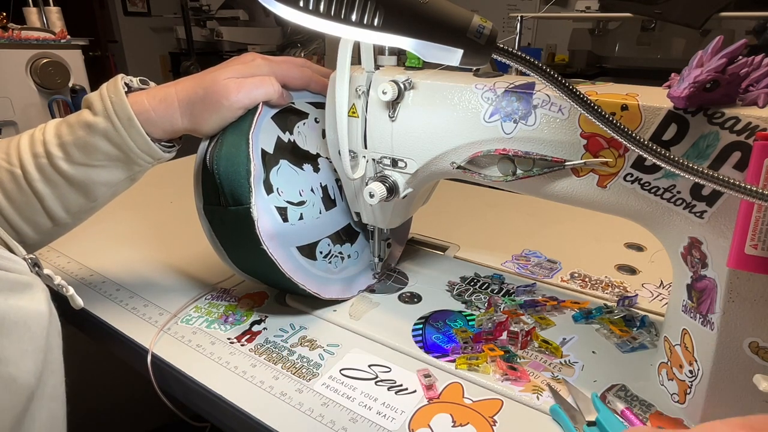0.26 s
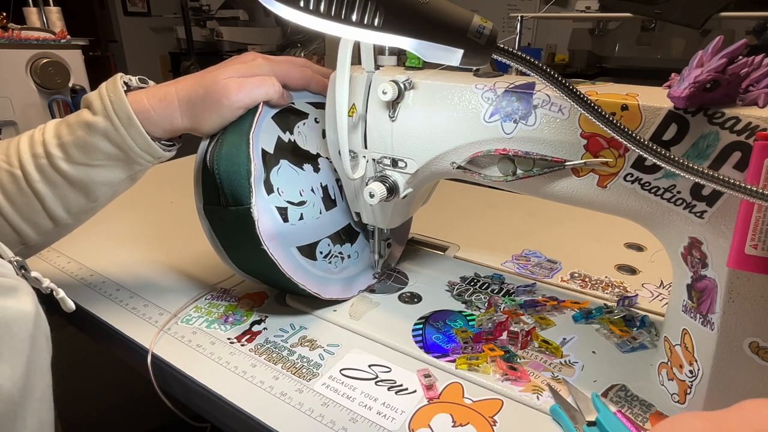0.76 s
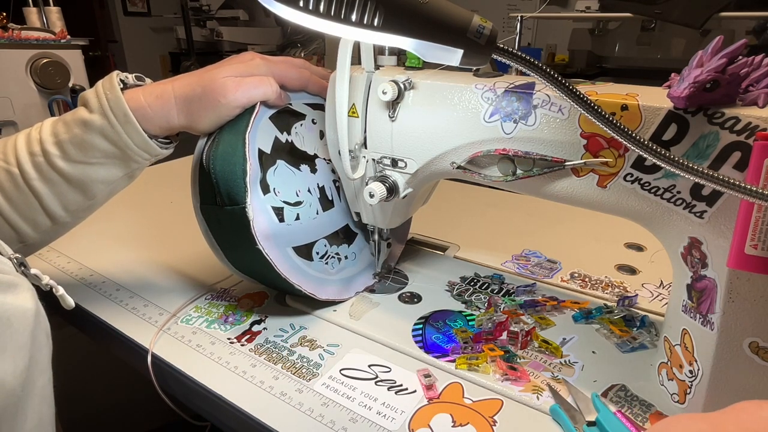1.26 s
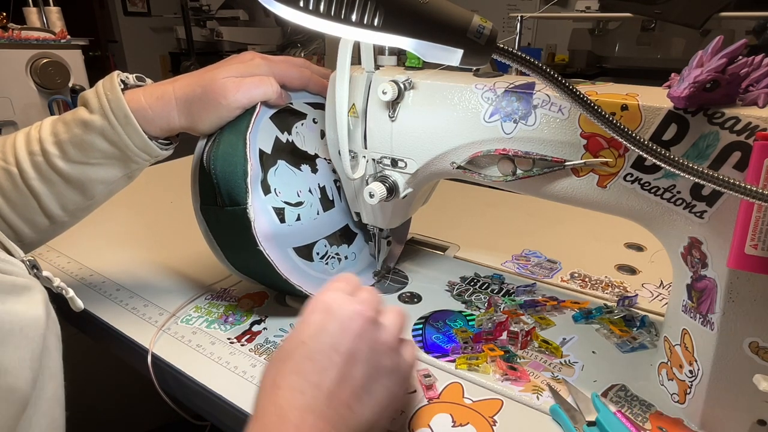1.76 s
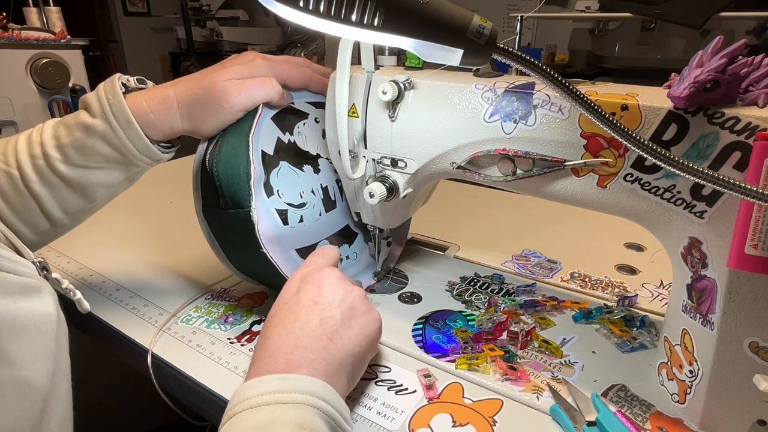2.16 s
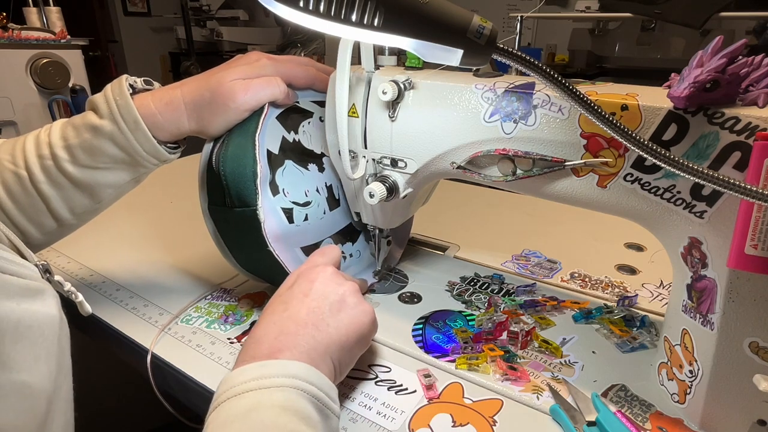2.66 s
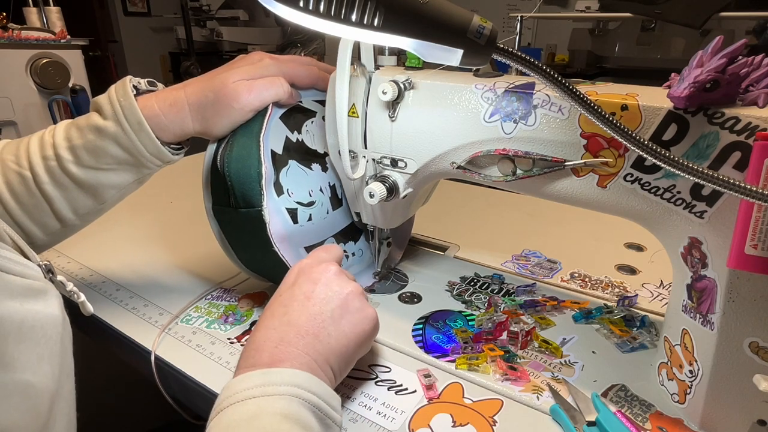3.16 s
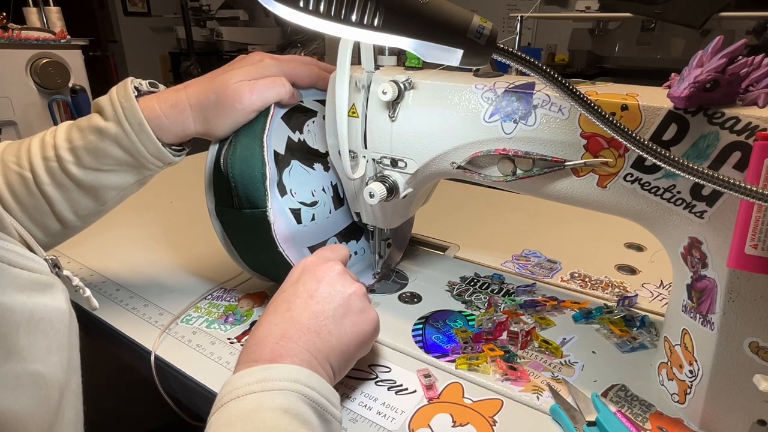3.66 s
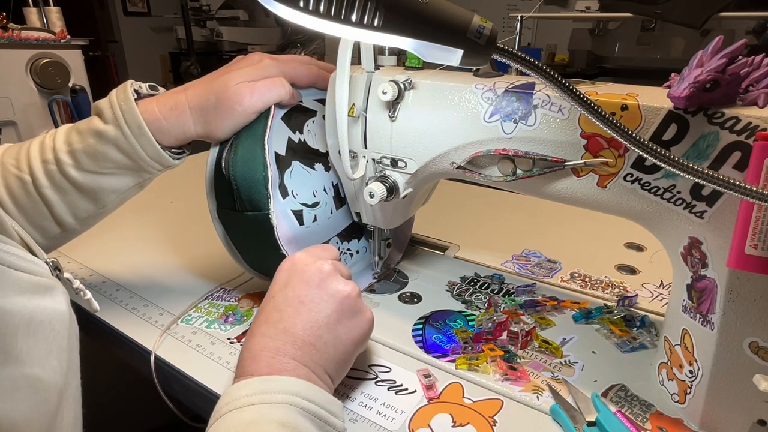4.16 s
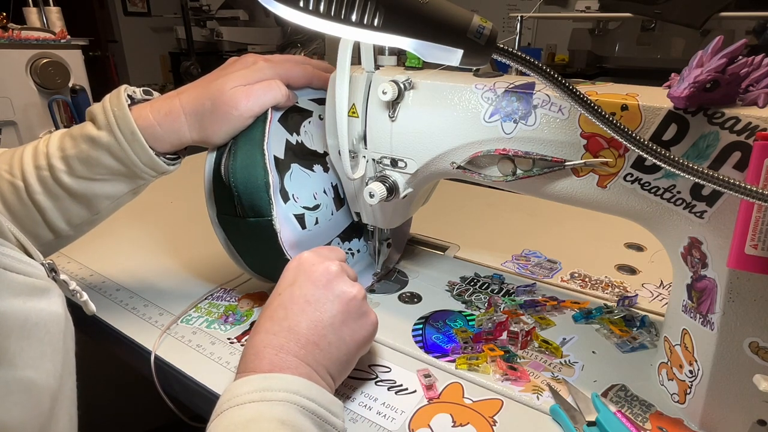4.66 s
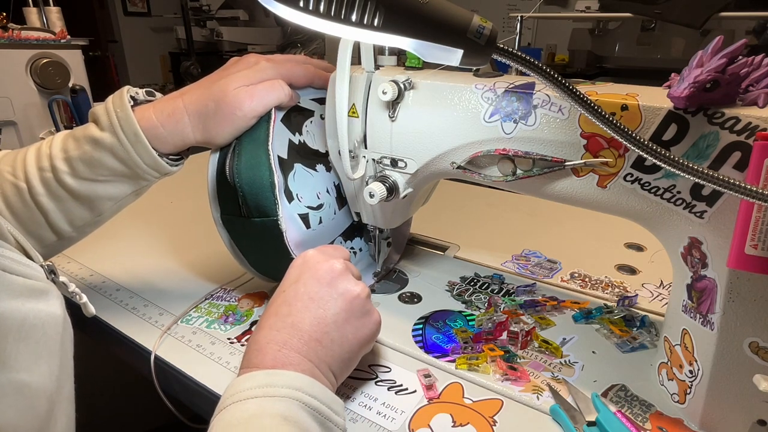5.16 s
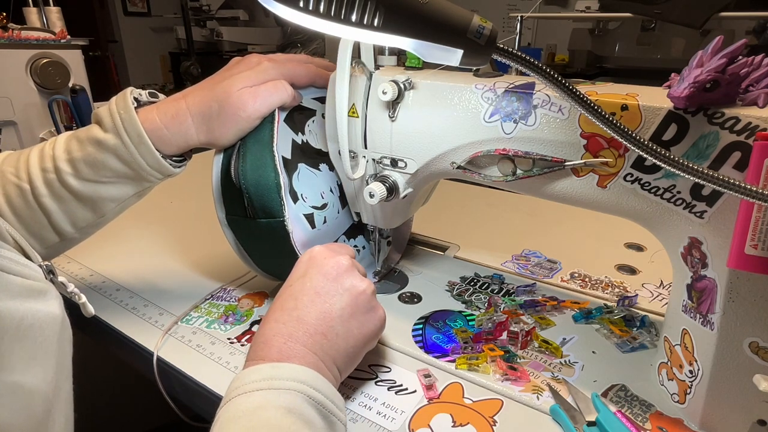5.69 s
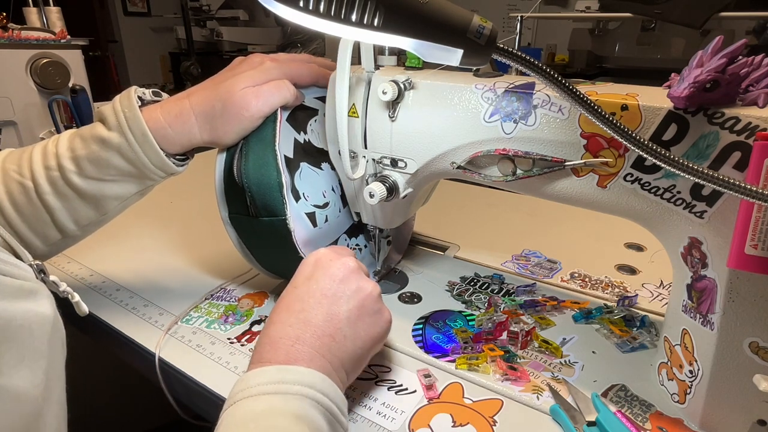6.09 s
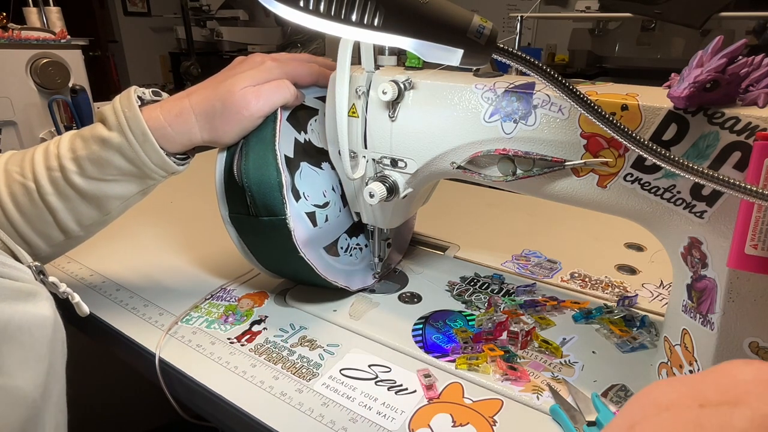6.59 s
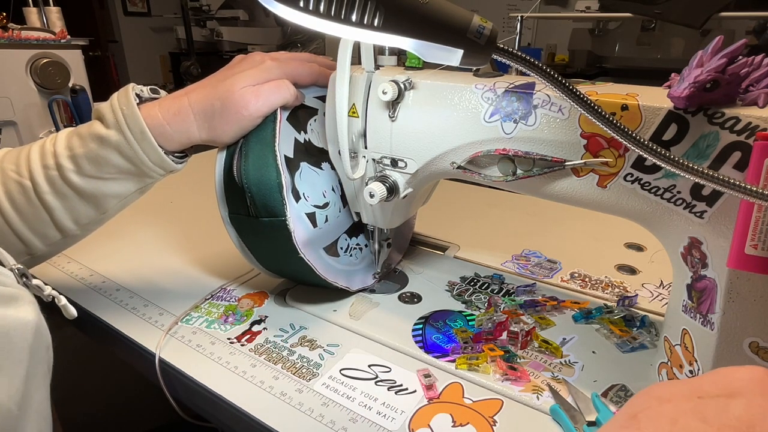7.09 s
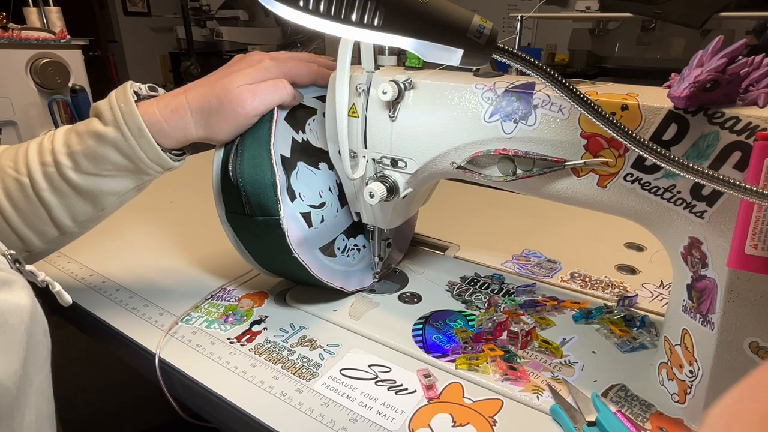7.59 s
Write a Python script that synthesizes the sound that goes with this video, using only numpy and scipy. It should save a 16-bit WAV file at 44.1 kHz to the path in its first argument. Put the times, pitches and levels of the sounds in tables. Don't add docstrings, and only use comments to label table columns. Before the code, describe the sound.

Close, in a quiet room with a short reverberation, a heavy sewing machine works on a table. At 0 a motor run is just dying while the metal presser foot clatters down, hardest near 0.1 seconds, followed by faint knocks. A plastic pedal switch snaps at 0.6, and at 0.7 the geared motor starts abruptly, purring and humming with a gritty metallic whirr and bearing hiss. From about 0.86 to 6.0 a bright steel clack comes every 0.43 seconds, with dull bed thumps, needle punches, thin ticks and jingling loose parts between. Another pedal snap sounds at 1.5. The motor stops at 6.3 with a low table boom; cloth brushes softly. The pedal clicks at 6.77, the motor runs again from 6.98 to 7.47 with one clack near 7.15, then a loud cluster of switch snaps, a boom and sliding cloth until about 7.8.

```python
import sys
import numpy as np
from scipy import signal
from scipy.fft import rfft, irfft, next_fast_len
from scipy.io import wavfile
from scipy.ndimage import map_coordinates

SR = 44100
rng = np.random.default_rng(int(sys.argv[2]) if len(sys.argv) > 2 else 0)


def level_to_linear(level):
    exponent = np.asarray(level, float) / 20
    return 10 ** exponent


def dump(signal):
    limited = np.clip(np.atleast_2d(signal).T, -1, 1)
    pcm = np.round(limited * 32767).astype(np.int16)
    wavfile.write(sys.argv[1], SR, pcm)


N = 345744


def unit(x):
    return x / np.sqrt(np.mean(np.abs(x) ** 2) + 1e-20)


def along(points, hz):
    point_hz, value = np.transpose(points)
    return np.interp(np.log(hz + 1), np.log(point_hz + 1), value)


def curves(rows):
    s, *columns = np.transpose(rows)
    return [np.interp(np.arange(N) / SR, s, column) for column in columns]


def wobble(rate_hz):
    coarse = np.arange(0, N + 32, 32)
    knots = rng.standard_normal(int(N * rate_hz / SR) + 4)
    return np.interp(np.arange(N), coarse, map_coordinates(knots, [coarse * rate_hz / SR]))


def filtered(x, response):
    size = next_fast_len(N + SR // 8)
    return irfft(rfft(x, size) * response(np.fft.rfftfreq(size, 1 / SR)), size)[..., :N]


def modes(table):
    def response(f):
        total = 0
        for k, (hz, width_hz, db) in enumerate(table):
            damping = 1j * f * width_hz
            total = total + (-1) ** k * level_to_linear(db) * damping / (hz * hz - f * f + damping)
        return unit(total)
    return response


def colour(points):
    closed = [(points[0][0] / 2, -90)] + list(points)
    return lambda f: unit(level_to_linear(along(closed, f)))


def bursts(times, db, rise_s, t60_s):
    power = np.zeros(N)
    starts = np.round(np.asarray(times) * SR).astype(int).clip(0, N - 1)
    np.add.at(power, starts, level_to_linear(db) ** 2)
    fall, climb = level_to_linear(-120 / t60_s / SR), np.exp(-1 / rise_s / SR)
    power = signal.lfilter([1], [1, -fall], power)
    power = signal.lfilter([1 - climb], [1, -climb], power)
    return np.sqrt(np.abs(power)) * rng.standard_normal(N)


def rings(rows, rise_s, t60_s, drop=0):
    out, t = np.zeros(N + SR), np.arange(SR // 8) / SR
    for s, db, hz in rows:
        phase = 2 * np.pi * hz * (t - drop * rise_s * np.exp(-t / rise_s))
        swell = level_to_linear(db - 60 * t / t60_s) * (1 - np.exp(-t / rise_s)) ** 2
        out[round(s * SR):][:len(t)] += swell * np.sin(phase)
    return out[:N]


def swells(times, db, rise, fall):
    coarse = np.arange(0, N + 64, 64)
    late_s = coarse / SR - np.asarray(times)[:, None]
    slope_db = np.where(late_s < 0, rise * late_s, -fall * late_s)
    power = level_to_linear(np.asarray(db)[:, None] + slope_db) ** 2
    return np.interp(np.arange(N), coarse, power.sum(0))


# start_s, stop_s, body_level_db, gear_level_db, gear_change_over_run_db
RUNS = [
    (0.0, 0.16, 4, 3, -28),
    (0.691, 6.29, 0, 0, 0.5),
    (6.977, 7.47, -0.5, 2, -4),
]


def running(coast_s):
    rows = []
    for start, stop, body, gear, change in RUNS:
        rows += [(start - 0.006, -60, -60), (start, body, gear)]
        rows += [(stop, body, gear + change), (stop + coast_s, -60, -60)]
    return curves(rows)


# start_s, foot_clack_db, foot_rebound_db, foot_thump_db
STITCHES = [(0.8631, -23, -49, -48), (1.276, -26.5, -57, -48), (1.7021, -25, -29.5, -32),
            (2.1293, -25, -32.5, -30), (2.563, -25.5, -33, -46), (2.9908, -26, -58, -27),
            (3.4232, -24.5, -54, -30.5), (3.852, -24, -40.5, -32), (4.278, -25.5, -51, -46),
            (4.7072, -25, -47.5, -32), (5.1393, -24, -46, -31), (5.565, -24, -37.5, -28.5),
            (5.9996, -24, -47.5, -54), (7.1537, -24, -36, -53)]


def since_stitch():
    t, stitch_s = np.arange(N) / SR, np.transpose(STITCHES)[0]
    return np.abs(t - stitch_s[np.searchsorted(stitch_s, t) - 1])


# pitch_hz, width_hz, level_db
GEARS = [(800, 210, 1.5), (3715, 190, 3), (4570, 540, -5.5)]
# pitch_hz, width_hz, level_db
TEETH = [(1667, 310, -1.5), (3250, 170, -1.5), (3694, 260, -1.5)]
# pitch_hz, width_hz, level_db
WHINE = [(601, 22, 1), (795, 24, 2), (1733, 23, 0), (3763, 38, -9.5)]


def gears(turn, gear_db):
    def at(part):
        return np.interp(np.arange(turn[-1]) + part, turn, np.arange(N) / SR)

    size_db = rng.standard_normal((len(at(0)), 2))
    grind = rng.standard_normal(N)
    push = np.diff(np.floor(turn - 0.88), prepend=-3) * level_to_linear(wobble(40))
    first = unit(bursts(at(0.86), size_db[:, 0], 0.0011, 0.029)) + 0.41 * grind + 0.55 * unit(push)
    second = unit(bursts(at(0.064), size_db[:, 1], 0.001, 0.024)) + 0.63 * grind
    knocks = unit(filtered(first, modes(GEARS)) + 1.3 * filtered(second, modes(TEETH)))

    tooth_db = size_db[:, 0] + 1.4 * rng.standard_normal(len(size_db))
    tooth_hz = 3758 + 30 * rng.standard_normal(len(size_db))
    tooth = rings(np.c_[at(0.89), tooth_db, tooth_hz][:-1], 0.0023, 0.027)
    whine = unit(filtered(rng.standard_normal(N), modes(WHINE)))
    sound = level_to_linear(gear_db - 5.5) * knocks + level_to_linear(gear_db + 7.5) * tooth + level_to_linear(gear_db - 10.5) * whine
    return sound, first


# pitch_hz, level_db_per_hz
SIZZLE = [(1500, -11.5), (2500, 2), (4000, -4), (6000, -5.5), (8000, -7.5), (10000, -6.5), (13000, -16.5),
          (15500, -17.5)]


def bearings(turn, sizzle_db):
    phase = 2 * (turn + 0.12 * wobble(30)) % 1
    tick = 0.5 + level_to_linear(5 * wobble(9) - 5) * np.exp(-phase / 0.15)
    flutter_db = 4.7 * wobble(45) + 11 * np.exp(-since_stitch() / 0.25) - 2.5
    hiss = unit(filtered(tick * rng.standard_normal(N), colour(SIZZLE)))
    return level_to_linear(sizzle_db + 7.0 + flutter_db) * hiss


# start_s, boom_db, hum_db
JOLTS = [(0.0, -61, -56), (0.62, -56, -60), (0.77, -50.5, -62), (1.57, -55, -44), (5.9, -59, -49),
         (6.35, -49, -54.5), (6.83, -56, -56), (7.08, -46, -58), (7.53, -47, -45), (6.5, -72.5, -70),
         (7.7, -68, -56)]


def table_hum(turn, strain):
    t = np.arange(N) / SR
    stitch_s = np.transpose(STITCHES)[0]
    jolt_s, boom_db, jolt_hum_db = np.transpose(JOLTS)
    lurch_db = 1.5 * rng.standard_normal(len(stitch_s))
    shake_s = np.r_[jolt_s, stitch_s + 0.27]

    def shake(jolt_db, arm_db):
        return swells(shake_s, np.r_[jolt_db, lurch_db + arm_db], 190, 112) + level_to_linear(-86) ** 2

    lull_db = -14 * np.exp(-((t - 1.41) / 0.096) ** 2)
    steady_db = -56 + running(0.18)[1] - 10 * strain + lull_db
    hum_level = np.sqrt(level_to_linear(steady_db) ** 2 + shake(jolt_hum_db, -61)) * level_to_linear(3.3 * wobble(16))
    hum = hum_level * np.sin(4 * np.pi * turn + 0.8 * wobble(14))
    boom_level = np.sqrt(shake(boom_db, -59)) * level_to_linear(2.5 + 1.5 * wobble(11))
    boom_hz = 50 + 4 * wobble(11)
    return hum + boom_level * np.sin(2 * np.pi * np.cumsum(boom_hz) / SR)


# time_s, turns_made
TURNS = [(0, -1.2), (6.3, 246.19), (7, 274.12), (7.84, 307.13)]
# pitch_hz, level_db_per_hz
BODY = [(59, -43), (100, -11), (128, -16), (245, 1), (446, -6.5), (592, -1), (671, -3.5), (804, -10.5),
        (901, -13.5), (1500, -14.5), (1950, -47.5), (3300, -120)]
# pitch_hz, width_hz, level_db
BED = [(250, 62, 1), (390, 173, -2.5), (421.7, 51, 2.5), (594, 26.7, -7), (782, 76, -7.5), (1035, 890, -16)]


def motor():
    turn, = curves(TURNS)
    strain = np.exp(-((since_stitch() - 0.168) / 0.016) ** 2)
    body_db, gear_db = running(0.014)
    gear_sound, knocks = gears(turn, gear_db - 49 - 4.5 * strain)
    purr = unit(filtered(rng.standard_normal(N), colour(BODY)))
    purr = purr + 0.56 * unit(filtered(knocks, modes(BED)))
    purr = level_to_linear(body_db - 52.54 + 1.72 * wobble(30)) * purr
    return gear_sound + bearings(turn, gear_db - 68.5) + purr + table_hum(turn, strain)


# start_s, rumble_db, hiss_db
SETTLES = [
    (0.0, -60, -57),
    (0.2, -57, -84),
    (0.4, -63, -86),
    (0.61, -52.5, -67.5),
    (6.3, -57, -73),
    (6.7, -61, -92),
    (6.79, -58, -75),
    (7.53, -48.5, -69),
]
# start_s, rustle_db
BRUSHES = [
    (0.45, -69),
    (0.41, -70),
    (6.35, -73),
    (6.45, -78),
    (6.54, -68.5),
    (6.63, -67),
    (6.92, -63.5),
]
# pitch_hz, level_db_per_hz
RUMBLE = [(35, -36.5), (60, -12), (151, -10), (359, -15.5), (395, -21), (800, -26), (1040, -53.5),
          (1760, -120)]
RUSTLE = [(500, -8), (1000, -1.5), (1800, 1.5), (2600, 2.5), (3600, -15), (6000, -39.5)]
HISS = [(2500, -8), (3500, -4), (5000, -1.5), (8000, -4.5), (12000, -10.5), (15500, -19)]


def rest():
    s, rumble_db, hiss_db = np.transpose(SETTLES)
    rise, fall = 430, 83
    slide = np.clip((np.arange(N) / SR - 7.5) / 0.021, 0, 1)
    drone = level_to_linear(running(0.014)[0] - 60) ** 2
    rumble = swells(s, rumble_db, rise, fall) + drone + level_to_linear(-80) ** 2 + slide * level_to_linear(-62) ** 2
    brushed = swells(*np.transpose(BRUSHES), 250, 360)
    rustle = swells(s, hiss_db - 0.5, rise, fall) + brushed + level_to_linear(-80) ** 2 + slide * level_to_linear(-55.5) ** 2
    hiss = swells(s, hiss_db, rise, fall) + level_to_linear(-90.5) ** 2 + slide * level_to_linear(-55) ** 2
    out = np.zeros(N)
    for power, tone, sway_db in [(rumble, RUMBLE, 3), (rustle, RUSTLE, 3), (hiss, HISS, 1.5)]:
        noise = unit(filtered(rng.standard_normal(N), colour(tone)))
        out += np.sqrt(power) * level_to_linear(sway_db * wobble(25)) * noise
    return out


def clack(rows, loose_db, rattle_db, air_db, steel, air, wood):
    s, db, bright_db, knock_db = np.transpose(rows)
    blow = bursts(s + 0.0011, db - 0.8, 0.00048, 0.0083)
    blow += bursts(s + 0.0023, db + loose_db - 9.5, 0.00056, 0.032)
    blow += bursts(s + 0.016, db + loose_db - 24.5, 0.0011, 0.0307)
    blow[np.round((s + 0.0026) * SR).astype(int)] += level_to_linear(db + 9.5)
    scrape = bursts(s - 0.001, db - 19.5, 0.002, 0.24) + bursts(s, db - 8.5, 0.00088, 0.026)
    rattle = filtered(level_to_linear(rattle_db) * scrape, colour(SIZZLE))
    knock = filtered(bursts(s + 0.0037, db + knock_db - 4.0, 0.0053, 0.14), modes(wood))
    sheen = bursts(s, db + bright_db - 2.0, 0.0007, 0.075)
    sheen += bursts(s, db + air_db + bright_db - 7.5, 0.0008, 0.2)
    return filtered(blow, modes(steel)) + rattle + knock + filtered(sheen, modes(air))


# start_s, peak_db, brightness_db, knock_db
CLACKS = [
    (0.0267, -20, -10.5, -31.5),
    (0.0382, -16, -24.5, -24),
    (0.0945, -14, -18.5, -31.5),
    (0.1176, -41.5, -26, 11),
    (0.1195, -31.5, -20.5, -25),
    (0.1349, -20.5, -30, -10.5),
]
# pitch_hz, width_hz, level_db
LOWERED = [(1900, 450, 2.5), (1177, 500, -7.5), (4520, 720, 2), (6300, 910, -1.5), (8500, 2300, -4)]
AIR = [(13300, 1500, 1.5), (11500, 2100, -1.5), (15000, 2000, -3.5)]
PLATE = [(444, 86, 3), (300, 110, -10), (750, 300, -2), (1150, 400, -9)]
# pitch_hz, width_hz, level_db
FOOT = [(1740, 1200, 1), (3370, 150, 3.5), (4450, 380, 2.5), (5750, 1200, 1), (6640, 3800, -2.5),
        (10900, 1200, -8.5)]
SHEEN = [(13390, 250, 3), (12060, 1700, -3.5), (15130, 1700, -5.5)]


def foot():
    bright_db, knock_db = -16.5, -15.5
    free = [(s, db, bright_db, knock_db) for s, db, _, _ in STITCHES]
    held = clack(CLACKS, -7.5, -7, -18.5, LOWERED, AIR, PLATE)
    return held + clack(free, 0, 0, 0, FOOT, SHEEN, BED)


# start_s, peak_db, pitch_hz
BUMPS = [(0.096, -22.5, 463), (0.108, -27, 432), (0.524, -40.5, 250), (0.602, -35.5, 355),
         (0.687, -38.5, 255), (0.847, -41.5, 416), (0.917, -33.5, 308), (1.054, -35, 397),
         (1.261, -35, 390), (1.328, -28.5, 310), (1.44, -36, 310), (1.517, -29.5, 354), (1.679, -36, 316),
         (1.885, -36.5, 362), (2.0, -33, 392), (2.483, -31.5, 320), (3.674, -35, 312), (3.807, -40, 322),
         (4.961, -47, 250), (5.954, -35, 402), (5.991, -39.5, 293), (6.091, -33, 378), (6.69, -53, 422),
         (6.775, -36, 345.1), (6.983, -30.5, 292), (7.215, -31.5, 310.1), (7.486, -27, 322)]
# start_s, peak_db
NEEDLE = [(1.929, -33.5), (2.358, -30), (2.753, -33), (3.203, -36), (3.609, -36), (4.069, -29.5),
          (4.465, -34), (4.897, -40.5), (5.354, -30.5), (5.755, -35), (6.189, -31.5), (7.367, -33.5)]


def bed():
    needle_hz, thump_hz = 246, 340
    free = list(BUMPS) + [(s, db, needle_hz) for s, db in NEEDLE]
    choked = [(s + 0.01646, db, thump_hz) for s, _, _, db in STITCHES]
    s, db, _ = np.transpose(free + choked)
    swings = level_to_linear(7.0) * rings(free, 0.0025, 0.034, drop=0.26)
    swings += level_to_linear(18.5) * rings(choked, 0.005, 0.023, drop=0.21)
    return swings + filtered(bursts(s, db - 9.0, 0.0035, 0.082), modes(BED))


# start_s, peak_db, middle_db
TICKS = [(0.167, -38, 2.5), (0.259, -55.5, -16), (0.388, -49, 0.5), (0.6809, -42, -17),
         (0.7426, -40.5, -15), (0.9324, -35.5, -19), (1.0377, -37, -11), (1.135, -41.5, -16),
         (1.376, -37.5, -20), (1.5635, -39, -16), (1.955, -40, -1), (2.8512, -37.5, -17), (2.881, -48, 7.5),
         (2.925, -42, -5), (3.069, -36, -24), (3.5188, -41, -7), (3.5967, -38, -28.5), (3.8293, -50, 8.5),
         (3.8721, -53, 12), (3.9255, -34.5, -14), (4.558, -36.5, -16), (5.0262, -44, -9), (5.313, -44, -12),
         (5.6451, -39.5, -6.5), (5.9279, -45.5, -12), (6.0733, -49.5, -6), (6.0903, -48.5, 10.5),
         (6.308, -49.5, -15), (7.2158, -39.5, -10), (7.4114, -35, -30)]
# start_s, peak_db, middle_db
FAINT = [
    (0.325, -74.5, 14),
    (0.5003, -72.5, 9.9),
    (0.5233, -66.5, 2),
    (6.689, -68.5, 11.5),
]
# start_s, peak_db
FEEDS = [(0.8892, -40), (1.0117, -41), (1.0595, -41), (1.1823, -46), (1.2117, -48), (1.4781, -38),
         (1.5749, -40), (1.5878, -43), (1.5978, -42), (1.9092, -39.5), (2.0079, -44), (2.0917, -46),
         (2.2948, -47.5), (2.3292, -36.5), (2.384, -45), (2.4295, -43), (2.6964, -42), (2.7624, -42),
         (2.7724, -47), (2.888, -49.5), (2.8998, -47), (3.1823, -46.5), (3.3628, -57), (3.507, -44),
         (3.6148, -36), (3.731, -43), (3.991, -45), (4.0558, -40.5), (4.102, -39.5), (4.172, -45.5),
         (4.3855, -40.5), (4.4763, -42), (4.5322, -40.5), (4.7771, -45), (4.9203, -43.5), (5.0374, -44),
         (5.2411, -40), (5.3428, -36.5), (5.3897, -37.5), (5.6826, -40), (5.8786, -49)]
# pitch_hz, level_db_per_hz
TICK = [(1500, -10), (2500, -0.5), (4000, -2), (6000, -5), (8000, -5.5), (10000, -12), (13000, -24),
        (15500, -23.5)]
FEED = [(3200, -8), (4800, 3.5), (6500, -5), (8000, -3), (10000, -10.5), (13000, -19.5), (15500, -19)]


def ticks():
    slaps = [(s + 0.018, db - 25.5, 14.5) for s, _, _, db in STITCHES]
    s, db, middle_db = np.transpose(list(TICKS) + list(FAINT) + slaps)
    feed_s, feed_db = np.transpose(FEEDS)
    high = filtered(bursts(s, db - 0.5, 0.0005, 0.027), colour(TICK))
    middle = filtered(bursts(s, db + middle_db + 4.5, 0.00077, 0.016), modes([(1360, 870, 0)]))
    feed = filtered(bursts(feed_s - 0.001, feed_db - 3, 0.0006, 0.024), colour(FEED))
    return high + middle + feed


# start_s, peak_db, low_ring_db
RODS = [
    (0.2794, -41, -36),
    (0.5397, -34, -23),
    (6.7034, -37.5, -36),
    (6.975, -43, -5),
]
# start_s, peak_db, low_ring_db
JINGLES = [(2.566, -46, 4), (2.682, -46, 3), (2.8167, -43, -2), (4.9623, -41, -4), (0.6991, -33, -5),
           (0.9453, -32, -18), (0.9664, -32.5, -6), (1.436, -37.5, 1.5), (1.8058, -33, -21),
           (1.8174, -36.5, 5), (1.8462, -36, -20), (2.1994, -42.5, 2), (2.2324, -35.5, -23),
           (2.2418, -31.5, -2.5), (2.6584, -37.5, -2), (3.2091, -35.5, 0.5), (3.5773, -41, 7.5),
           (3.6386, -33, -1), (4.3051, -36, -11), (4.3544, -38, -4), (4.4074, -36.5, 1), (4.7944, -39.5, 0),
           (4.8459, -41, 3.5), (5.219, -37, -10), (5.2724, -42.5, 4), (5.6933, -39.5, -3),
           (5.7808, -34, -0.5), (6.1577, -45, 0), (6.2242, -31, -3.5), (6.987, -38.5, 3),
           (7.2505, -32.5, -5), (7.2669, -29, -9.5), (7.454, -33.5, -2)]
# pitch_hz, width_hz, level_db
ROD = [(2400, 60, -7.5), (3420, 120, -8.5), (4500, 150, -4.5), (5470, 120, 3), (6880, 120, 4),
       (8000, 150, -0.5)]
STEEL = [(3185, 82, 1.5), (4720, 380, -1), (5440, 540, -5.5), (7060, 210, -1), (8070, 150, 0.5),
         (9570, 1300, -6)]


def jingles():
    rebounds = [(s + 0.031, db, -4.5) for s, _, db, _ in STITCHES]
    s, db, low_db = np.transpose(list(RODS) + list(JINGLES) + rebounds)
    rods = len(RODS)
    bright_db = np.where(np.arange(len(s)) < rods, -28.5, -8)
    rod = filtered(bursts(s[:rods], db[:rods] - 6.5, 0.0007, 0.061), modes(ROD))
    steel = filtered(bursts(s[rods:], db[rods:] - 7.5, 0.0008, 0.11), modes(STEEL))
    click = filtered(bursts(s, db - 4.0, 0.00029, 0.019), colour(SIZZLE))
    low_hz = 2010 + 12 * rng.standard_normal(len(s))
    low = rings(np.c_[s, db + low_db + 3, low_hz], 0.0019, 0.051)
    sheen = filtered(bursts(s, db + bright_db - 6.5, 0.0007, 0.11), modes(SHEEN))
    return rod + steel + click + low + sheen


# start_s, peak_db, pitch_hz, length_ms
SNAPS = [(0.593, -15.5, 2837, 8.7), (1.5064, -18.5, 2950, 4.2), (1.5135, -60, 3100, 5.46),
         (1.52, -30.5, 2960, 5.9), (1.5274, -35, 3100, 5.5), (6.7658, -19, 2930, 6.5),
         (7.477, -8.5, 2926, 4.8), (7.479, -24, 2910, 6.8), (7.4828, -26, 3250, 9.2),
         (7.4996, -17.5, 3000, 5.5), (7.5156, -23.5, 3070, 5.5), (7.5268, -33, 2950, 6)]
# pitch_hz, level_db_per_hz
CLICK = [(300, -4.5), (1000, -7), (3000, -7), (6000, -5.5), (8500, -5.5), (10000, -14), (15500, -48)]
# pitch_hz, width_hz, level_db
CASE = [(2950, 550, -0.5), (2150, 400, -7)]


def pedal():
    start_s, peak_db, _, _ = np.transpose(SNAPS)
    out = filtered(bursts(start_s, peak_db - 14, 0.00056, 0.031), colour(CLICK))
    out += filtered(bursts(start_s + 0.004, peak_db - 34.5, 0.002, 0.24), modes(CASE))
    for s, db, hz, ms in SNAPS:
        u = np.linspace(0, 1, round(ms * SR / 1000))
        swell = np.sin(np.pi * u ** 0.42) ** 1.4
        waver = 2.0 * u * u + 0.5 * np.sin(14 * u)
        tone = np.sin(2 * np.pi * hz * u * ms / 1000 + waver)
        out[round(s * SR):][:len(u)] += level_to_linear(db + 1.0) * swell * tone
    return out


# pitch_hz, time_s
ROOM = [(100, 0.35), (1000, 0.2), (4000, 0.17), (12000, 0.14)]


def room(x):
    hz, t, z = signal.stft(rng.standard_normal((2, SR // 2)), SR, nperseg=256)
    fade = level_to_linear(-60 * t / along(ROOM, hz)[:, None])
    tail = signal.istft(z * fade, SR, nperseg=256)[1]
    delayed = np.pad(x, (120, 0))[None]
    return signal.fftconvolve(delayed, tail / np.linalg.norm(tail[0]), axes=1)[:, :N]


# pitch_hz, lead_radians
LEAD = [(300, 0), (760, 1.6), (1450, -.4), (2050, -.7), (2420, -3), (2750, -4.3), (3400, -6.2), (4500, -7),
        (6300, -7.5), (8200, -8.5), (9200, -9.34), (10500, -9.52), (12300, -11), (13800, -12.56)]


def ports(x):
    side = np.array([[1], [-1]])

    def response(hz):
        lead = np.interp(hz, *np.transpose(LEAD))
        return np.exp(0.5j * lead * side) * level_to_linear(-0.4 * side * (hz < 7000))
    return filtered(x, response)


# pitch_hz, level_db
DIFFUSE = [(100, -20), (400, -9), (900, -6.5), (2500, -2.5), (4000, -8), (7000, -9.5), (8800, -17.5),
           (10800, -13), (12000, -11), (13800, -18.5)]


def scene():
    machine = motor() + rest() + foot() + bed() + ticks() + jingles()
    snaps = pedal()
    echo = room(machine + level_to_linear(-25) * snaps)
    return ports(machine + snaps) + filtered(echo, lambda hz: level_to_linear(along(DIFFUSE, hz)))


def band_limit(x):
    return signal.sosfilt(signal.butter(12, 16660, fs=SR, output="sos"), x)


# pitch_hz, level_db_per_hz
SELF_NOISE = [(10300, -34.5), (11300, -1.5), (15500, 1.5)]


def record(dry):
    heard = dry + level_to_linear(-89) * unit(filtered(rng.standard_normal(N), colour(SELF_NOISE)))

    def treble_cut(hz):
        return level_to_linear(-34 / (1 + np.exp(np.clip((15850 - hz) / 60, -50, 50))))
    return band_limit(filtered(heard, treble_cut))


dry = scene()
out = record(dry)
dump(out)
```